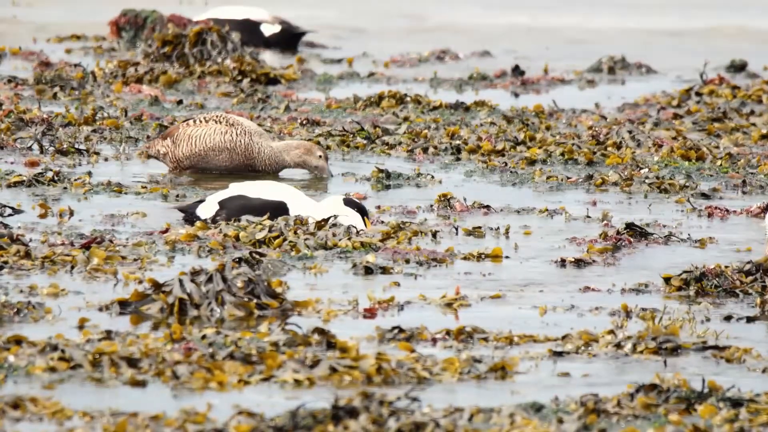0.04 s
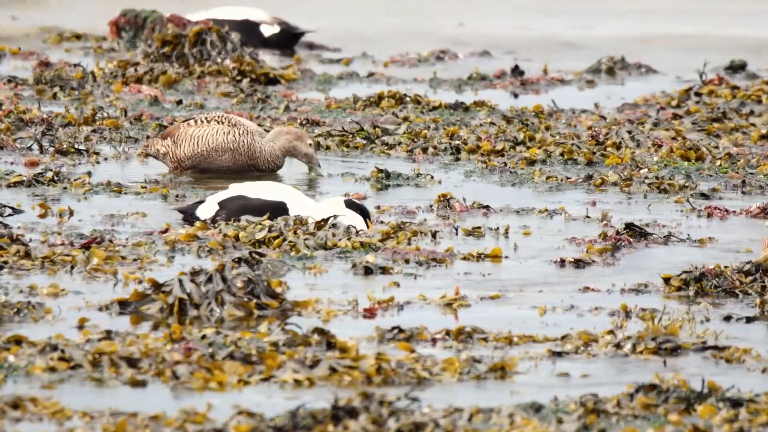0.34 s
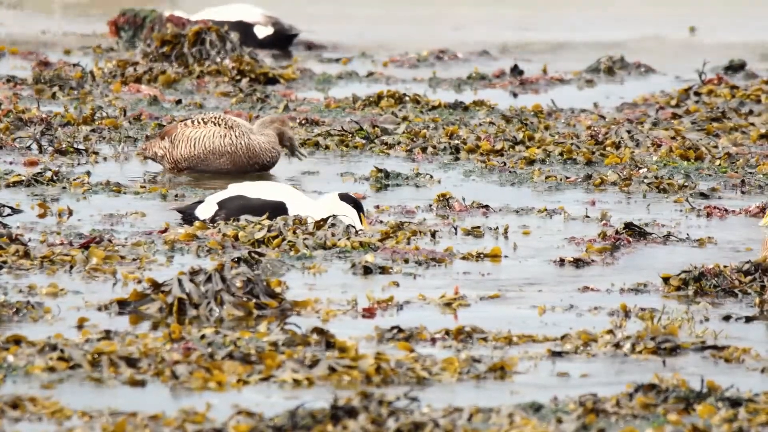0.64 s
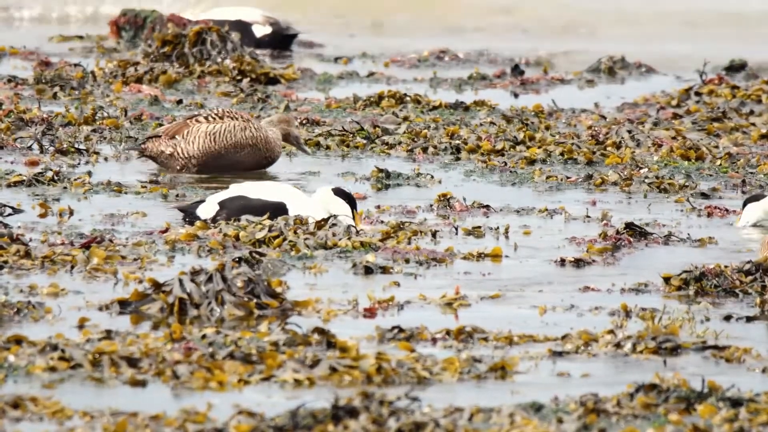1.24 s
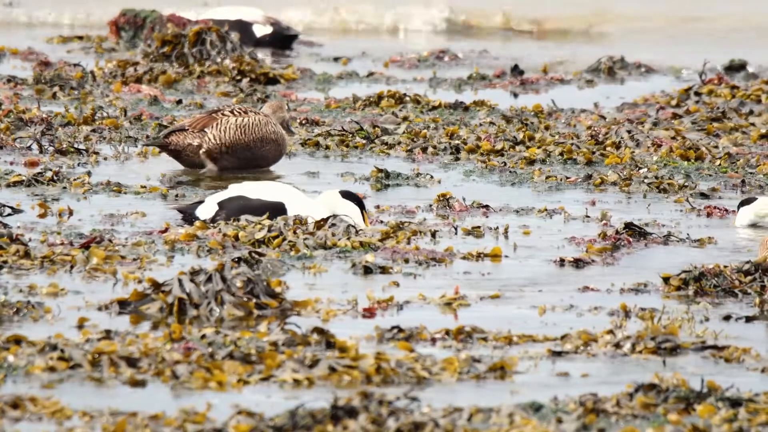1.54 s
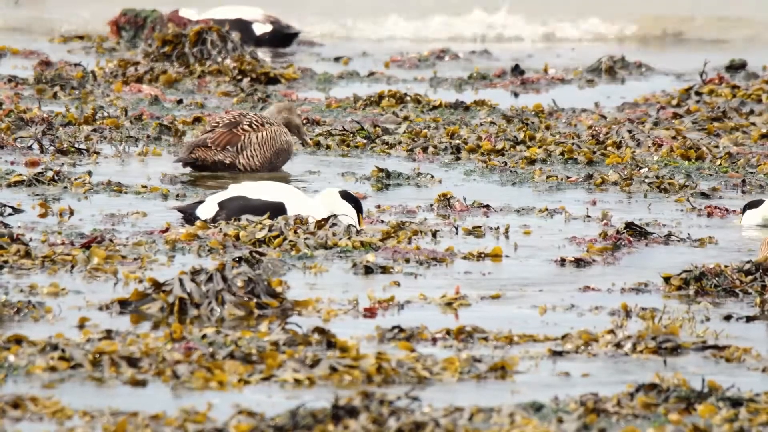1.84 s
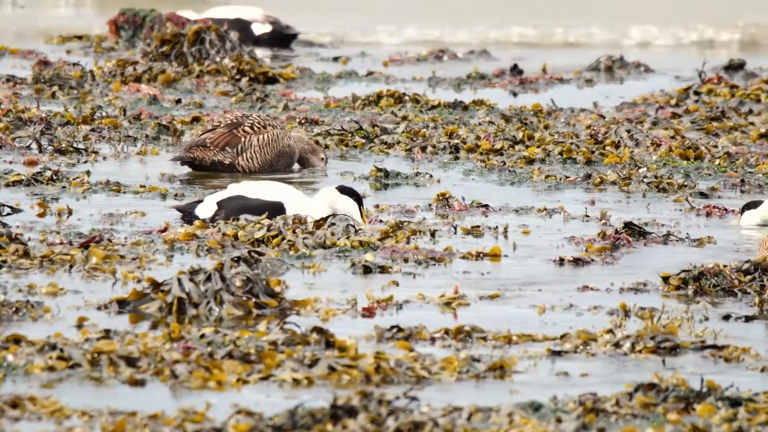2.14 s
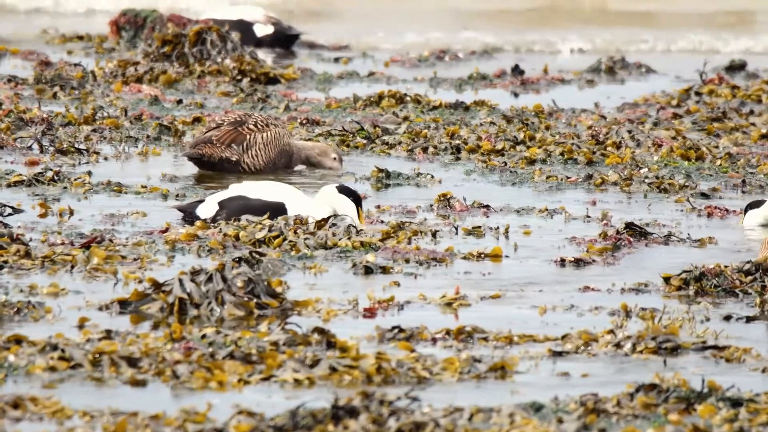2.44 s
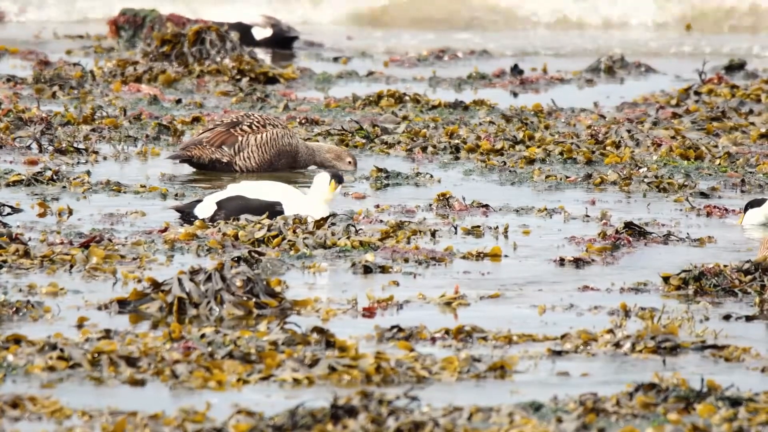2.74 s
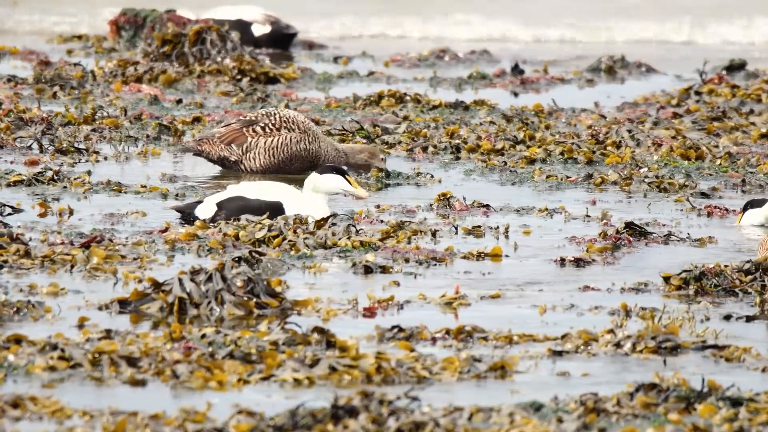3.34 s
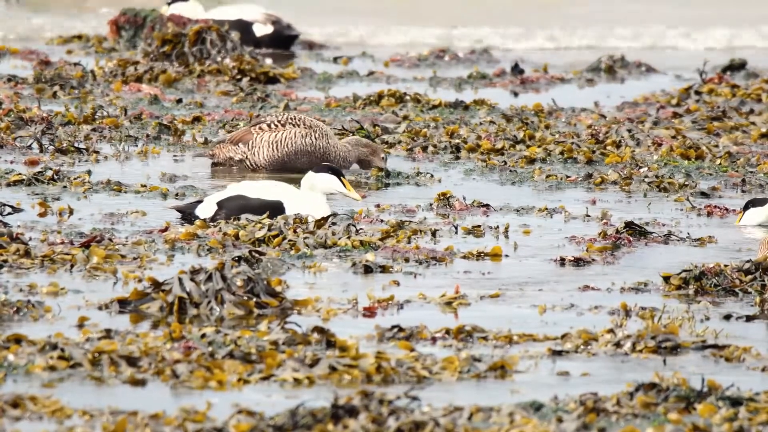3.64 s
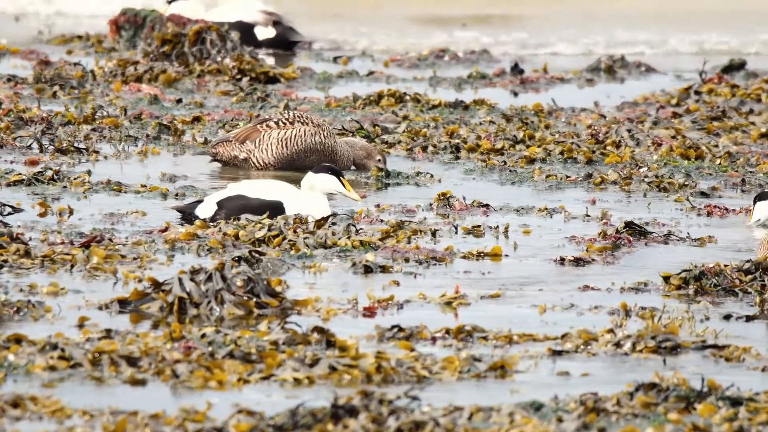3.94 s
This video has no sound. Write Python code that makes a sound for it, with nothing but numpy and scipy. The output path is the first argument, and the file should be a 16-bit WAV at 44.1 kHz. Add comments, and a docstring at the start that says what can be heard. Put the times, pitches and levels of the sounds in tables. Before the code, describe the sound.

A shorebird, slightly to the left, gives four short, high whistles that rise and fall, at about 0.4, 1.2, 2.1 and 2.9 seconds, the last two loudest. A soft pip leads each, and one more comes near 3.9 seconds. Quiet surf washes throughout and swells from about 3 seconds, over a faint, low, wavering drone. Wet seaweed makes a few tiny ticks.

```python
"""On a weedy shore, surf washes and swells as a wave breaks, over a low wavering drone.
A shorebird on the left gives four arched whistles, each announced by a soft pip. Its calls are
stacks of harmonics (whole multiples of one gliding pitch) that echo off nearby rocks.
The sea and the small ticks in the wet weed are shaped noise; a faint whistle falls farther off.
The recorder has two narrow dead bands in the treble."""
import sys
import numpy as np
from scipy import signal
from scipy.fft import rfft, irfft
from scipy.io import wavfile
from scipy.ndimage import uniform_filter1d

SR = 44100
rng = np.random.default_rng(int(sys.argv[2]) if len(sys.argv) > 2 else 0)


def int16_out(signal):
    """Quantize to a 16-bit WAV file."""
    q = np.round(np.clip(np.atleast_2d(signal).T, -1, 1) * 32767)
    wavfile.write(sys.argv[1], SR, q.astype(np.int16))


N = 176400  # 4 seconds

# tone colour of the noises: f/Hz, relative level/dB
SURF_COLOUR = [(60, -16.5), (145, -2), (187, 3), (210, -8.5), (235, -8.5), (260, -0.5), (300, -7),
               (350, -8), (450, -12), (540, -9.5), (780, -7), (1070, -10), (1500, -15), (2200, -22.5),
               (3000, -40), (6000, -45), (12000, -65)]
FOAM_COLOUR = [(500, -16), (1300, 1.5), (2100, 4.5), (2450, -1), (3100, -3.5), (3900, -7), (4700, -4),
               (5600, -1), (6400, -5), (7200, -13.5), (8300, -13.5), (9500, -17.5), (12000, -21),
               (15500, -25)]
RUMBLE_COLOUR = [(12, -47), (24, -27), (38, -9), (60, -6), (85, 4), (120, -1.5), (170, -2.5), (300, -43),
                 (2000, -82)]
TICK_COLOUR = [(2000, -12), (4500, -5), (6500, 3), (9500, -10), (15000, -26)]
# how each steady sound swells and fades: t/s, relative level/dB
SURF_SWELL = [(0, -54.5), (1.07, -54), (1.87, -51), (2.7, -51.5), (3.3, -49), (3.6, -47.5), (3.75, -45.2),
              (4, -45)]
FOAM_SWELL = [(0, -58), (1, -56), (2, -54), (3, -54.5), (4, -56.5)]
RUMBLE_SWELL = [(0, -64), (.5, -65), (1.1, -57), (1.8, -61.5), (2.15, -58.5), (2.35, -52.5), (2.6, -53.5),
                (2.8, -56), (3.25, -59.5), (3.5, -56), (4, -55.5)]
DRONE_SWELL = [(0, -59), (.3, -46), (.55, -59), (.85, -50), (1.2, -56), (1.42, -49.5), (1.62, -58.5),
               (2.05, -44.5), (2.2, -66), (2.47, -48.5), (2.85, -53.5), (3.04, -43), (3.25, -59),
               (3.5, -46.5), (3.8, -53.5), (3.97, -40.5)]
# how alike the sea is on both sides: f/Hz, likeness (1 same, 0 unrelated, -1 opposite)
SEA_LIKENESS = [(30, .3), (70, .92), (130, 0.95), (290, 0.76), (640, .6), (1410, -0.18), (3100, -0.47),
                (6820, 0.049), (9500, 0.11), (12500, -0.015), (15000, 0.013)]
# how much louder the left is than the right, for sea and bird: f/Hz, level/dB
SEA_BALANCE = [(60, .5), (170, 0), (330, 2), (700, 2.5), (1290, -1), (2380, -9.5), (4400, -3.5), (8120, -6),
               (15000, 5)]
BIRD_BALANCE = [(2300, 2), (2900, 0.5), (3170, 23.5), (4400, 3.5), (4800, 1), (5900, 4.5), (6330, 13),
                (6900, 7), (9000, 8), (9500, 9), (12500, 10)]
# ticks in the wet weed: t/s, level/dB
TICKS = [(0.1435, -54), (.7844, -54), (1.0474, -54), (2.887, -49)]
# soft pips: middle t/s, length/s, top f/Hz, level/dB, boost of harmonic 1/dB
PIPS = [(0.167, .028, 2400, -58, 0), (0.329, 0.044, 2206, -49, 7), (1.138, 0.036, 2283, -43.5, 4),
        (1.51, .028, 2370, -57, 0), (1.899, 0.031, 2410, -53.5, -5), (2.03, 0.039, 2304, -41.5, -0.5),
        (2.828, .033, 2280, -41.5, -1.5), (3.918, 0.039, 2170, -48, -7)]
# harmonics 1-6 of a pip: relative level/dB
PIP_HARMONICS = [-2, 4.5, -1.5, -10.5, -10.5, -29]
# one list of points for each whistle: t/s, f/Hz, level/dB
WHISTLES = [
    [(.417, 1700, -56), (.43, 2120, -47.5), (.445, 2300, -41), (.461, 2640, -32.5), (.469, 2960, -35),
     (.515, 3170, -26.5), (.548, 3199, -27), (.579, 3163, -25), (.59, 2980, -36.5), (.606, 2130, -38.5)],
    [(1.243, 1960, -50), (1.26, 2256, -45.5), (1.277, 2580, -34.5), (1.286, 2960, -35),
     (1.323, 3140, -28.5), (1.355, 3173, -28.5), (1.388, 3135, -30), (1.403, 3000, -33.5),
     (1.422, 2160, -43)],
    [(2.128, 1770, -50), (2.145, 2190, -40), (2.166, 2560, -34.5), (2.176, 2946, -28), (2.203, 3110, -26),
     (2.243, 3165, -20), (2.281, 3110, -23.5), (2.3, 2860, -26), (2.312, 2520, -35), (2.323, 1950, -54)],
    [(2.928, 1720, -58), (2.945, 2220, -39.5), (2.966, 2620, -32.5), (2.976, 2930, -26),
     (2.995, 3037, -26.5), (3.025, 3134, -23), (3.047, 3157, -23), (3.072, 3094, -26.5), (3.086, 2720, -29),
     (3.1, 2000, -59)],
]
# one row for each whistle: boost/dB of harmonics 1, 3 and 4
WHISTLE_COLOUR = [(6.5, 2, -2.5), (5.5, 5.5, 1.5), (-1, 0.5, -0.5), (-4.5, -2, 0)]
# the voice gets purer as it climbs: f/Hz, then relative level/dB of harmonics 1-6
VOICE = [(2260, -8.5, 0, -5, -16, -14, -30), (2600, -12.5, -0.27, -12, -9, -27, -38),
         (2980, -5.5, 0, -22, -20, -48, -55), (3130, -8, 0, -18, -34, -65, -65)]
# echoes from rocks: delay/s, left level/dB, right level/dB
ROCK_ECHOES = [(.0043, -21, -25.5), (.0091, -28, -21)]
# points along the far whistle: t/s, f/Hz, level/dB
FAR_WHISTLE = [(1.07, 6000, -68), (1.085, 5400, -57), (1.102, 5350, -56), (1.115, 4850, -54),
               (1.13, 4300, -65)]
# dead bands in the treble: f/Hz, width/Hz
DEAD_BANDS = [(2605, 570), (7760, 1270)]

FREQS = np.arange(N // 2 + 1) * SR / N  # f/Hz of each slot in a spectrum
SIDES = np.array([[1], [-1]])  # plus for left, minus for right


def undb(db):
    """Turn decibels into a factor to multiply by."""
    return 10 ** (np.asarray(db) / 20)


def curve(x, rows):
    """Join a table's points with straight lines and read them at x."""
    return np.interp(x, *np.array(rows).T)


def over_pitch(rows):
    """Spread rows of f/Hz and a value over the whole spectrum."""
    hz, value = np.array(rows).T
    return np.interp(np.log(FREQS + 1e-3), np.log(hz), value)


def wobble(rate):
    """A smooth random wiggle, about 1 in size, that changes about rate times a second."""
    wiggle = irfft(rfft(rng.standard_normal(N)) / (1 + (FREQS / rate) ** 4), N)
    return (wiggle - wiggle.mean()) / wiggle.std()


def delay(x, seconds):
    """The same sound a little later."""
    return irfft(rfft(x) * np.exp(-2j * np.pi * FREQS * seconds), N)


def wash(colour):
    """Watery stereo noise, alike on both sides in the bass and wide in the treble."""
    shared, opposed = rfft(rng.standard_normal((2, N)))
    alike = over_pitch(SEA_LIKENESS)
    both = shared * np.sqrt(1 + alike) + SIDES * opposed * np.sqrt(1 - alike)
    noise = irfft(both * undb(over_pitch(colour) + SIDES * over_pitch(SEA_BALANCE) / 2), N)
    return noise / noise.mean(axis=0).std()


def sea(t, surf_boost_db=2.5, rumble_boost_db=6.5):
    """The body of the surf, the hiss of foam and a deep rumble, each surging a little."""
    surf = wash(SURF_COLOUR) * undb(curve(t, SURF_SWELL) + surf_boost_db + .99 * wobble(27))
    foam = wash(FOAM_COLOUR) * undb(curve(t, FOAM_SWELL) + 1.53 * wobble(24))
    rumble = wash(RUMBLE_COLOUR) * undb(curve(t, RUMBLE_SWELL) + rumble_boost_db + .8 * wobble(11))
    return surf + foam + rumble


def drone(t, hz=105.5, wander=.027, waver_db=1.5):
    """A low hum, perhaps a far engine, that wavers in pitch and strength."""
    phase = 2 * np.pi * np.cumsum(hz * (1 + wander * wobble(11.7))) / SR
    return np.sqrt(2) * np.sin(phase) * undb(curve(t, DRONE_SWELL) + waver_db * wobble(10.5))


def weed_ticks(t, decay_s=.002, leftward_db=6):
    """Wet weed ticks: tiny bright bursts of noise that die at once."""
    hiss = irfft(rfft(rng.standard_normal(N)) * undb(over_pitch(TICK_COLOUR)), N)
    bursts = sum(undb(db) * (t >= start) * np.exp(-abs(t - start) / decay_s) for start, db in TICKS)
    return hiss / hiss.std() * bursts * undb(SIDES * leftward_db / 2)


def bird_note(hz, gain, harmonics_db):
    """Harmonics on one gliding pitch, weaker at the shaded right microphone."""
    phase, out = 2 * np.pi * np.cumsum(hz) / SR, 0
    for k, db in enumerate(harmonics_db, 1):
        left = gain * undb(db) * np.sin(k * phase)
        right = left * undb(-curve(k * hz, BIRD_BALANCE))
        out = out + np.array([left, right])
    return out


def pips(t, sag=.151, rough=.0086, skew=.25):
    """Short, reedy notes that swell quickly and fade, their pitch sagging at both ends."""
    out, jitter = np.zeros((2, N)), wobble(350)
    for middle, length, top_hz, db, boost_db in PIPS:
        on = abs(t - middle) < length / 2
        place = 2 * (t[on] - middle) / length  # -1 at the start, 1 at the end
        hz = top_hz * (1 - sag * abs(place) ** 2.4 + rough * jitter[on])
        gain = undb(db) * (1 - place ** 2) * (1 - skew * place)
        out[:, on] += bird_note(hz, gain, [PIP_HARMONICS[0] + boost_db, *PIP_HARMONICS[1:]])
    return out


def whistles(t, glide_s=.003, fade_s=.0035, rough_below_hz=2950):
    """Each slides up roughly, breaks into a pure arched tone and drops away."""
    out, jitter, flutter = np.zeros((2, N)), wobble(370), wobble(150)
    voice_hz, *voice_db = np.array(VOICE).T
    for points, (first, third, fourth) in zip(WHISTLES, WHISTLE_COLOUR):
        times, pitches, levels = np.array(points).T
        on = (t > times[0]) & (t < times[-1])
        now = t[on]
        hz = uniform_filter1d(np.interp(now, times, pitches), int(glide_s * SR), mode="nearest")
        boosts = [first, 0, third, fourth, 0, 0]
        harmonics = [np.interp(hz, voice_hz, db) + boost for db, boost in zip(voice_db, boosts)]
        rough = 1 / (1 + np.exp((hz - rough_below_hz) / 60))  # 1 when low, 0 when high
        shaky_hz = hz * (1 + (.00037 + .01 * rough) * jitter[on])
        flutter_db = (.62 + 3.5 * rough) * flutter[on]
        fade = np.clip(np.minimum(now - times[0], times[-1] - now) / fade_s, 0, 1)
        gain = undb(np.interp(now, times, levels) + flutter_db) * fade
        out[:, on] += bird_note(shaky_hz, gain, harmonics)
    return out


def shorebird(t, left_lag_s=.000113, scatter_db=-38, scatter_s=.2):
    """The calls arrive directly, off near rocks and as a faint scatter from the shore."""
    left, right = whistles(t) + pips(t)
    out = np.array([delay(left, left_lag_s), right])
    for lag, left_db, right_db in ROCK_ECHOES:
        out += undb([[left_db], [right_db]]) * delay(left, lag)
    tail = rng.standard_normal((2, SR // 2)) * undb(-60 * t[:SR // 2] / scatter_s)
    tail /= np.sqrt(np.sum(tail ** 2) / 2)
    scatter = signal.fftconvolve(left[None], tail, axes=1)[:, :N]
    return out + undb(scatter_db) * scatter


def far_whistle(t, rough=.0346):
    """A thin, unsteady tone that slides down, farther off."""
    times, pitches, levels = np.array(FAR_WHISTLE).T
    hz = np.interp(t, times, pitches) * (1 + rough * wobble(194))
    gain = undb(np.interp(t, times, levels)) * (t > times[0]) * (t < times[-1])
    return gain * np.sin(2 * np.pi * np.cumsum(hz) / SR)


def scene():
    """Birds, weed, sea and drone together."""
    t = np.arange(N) / SR
    return shorebird(t) + far_whistle(t) + weed_ticks(t) + sea(t) + drone(t)


def record(dry, top_hz=15800):
    """Cut off the highest treble steeply and take out the two dead bands."""
    gain = 1 / np.sqrt(1 + (FREQS / top_hz) ** 400)
    for hz, width_hz in DEAD_BANDS:
        gain *= abs(FREQS - hz) / np.hypot(FREQS - hz, width_hz / 2)
    return irfft(rfft(dry) * gain, N)


dry = scene()
out = record(dry)
int16_out(out)
```